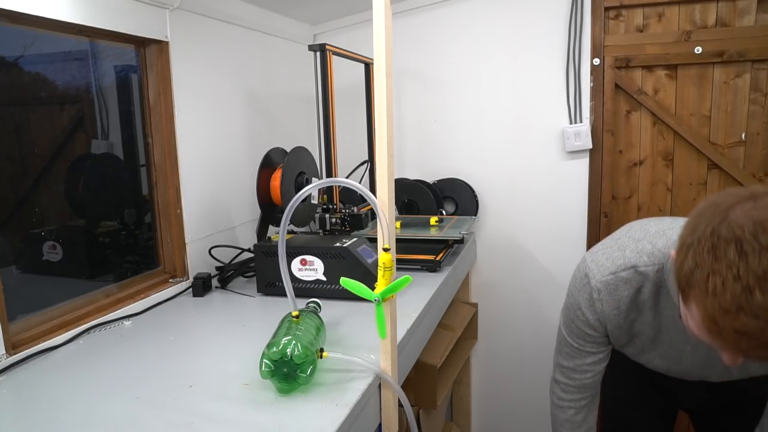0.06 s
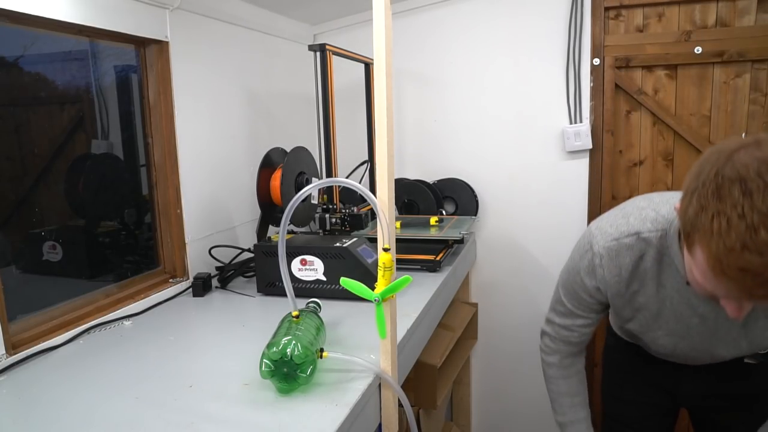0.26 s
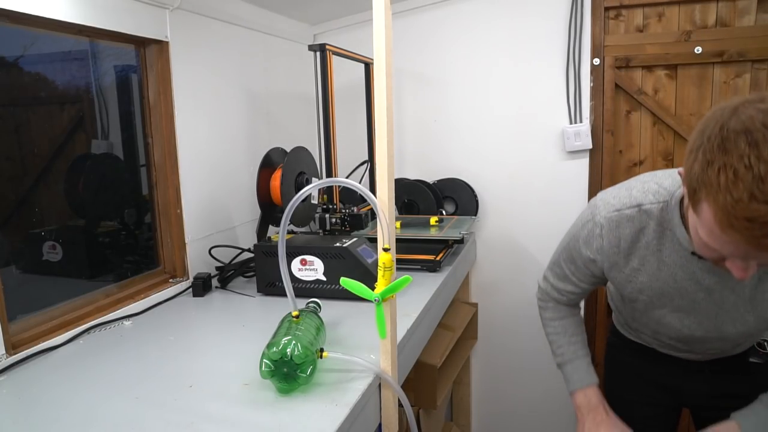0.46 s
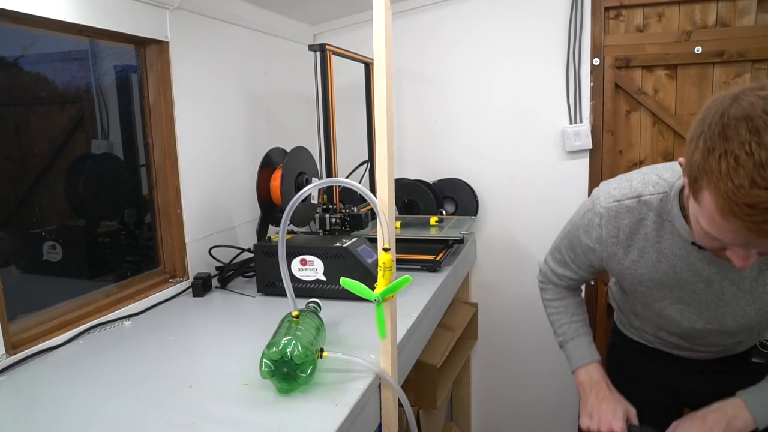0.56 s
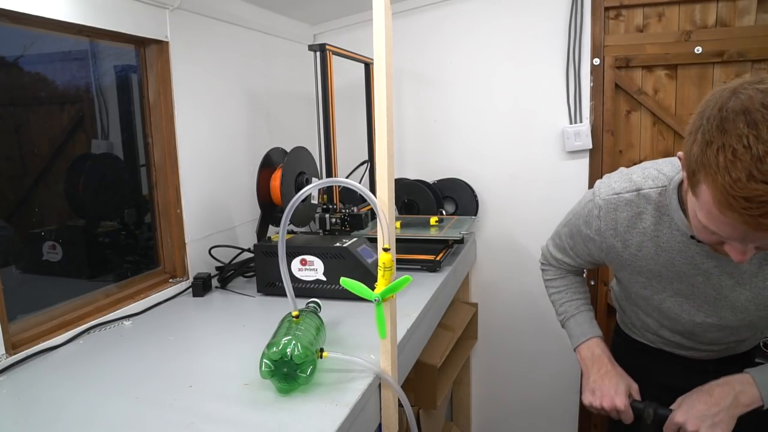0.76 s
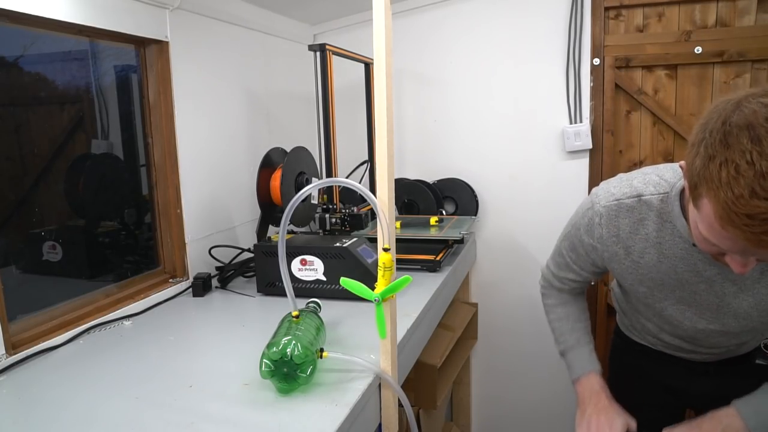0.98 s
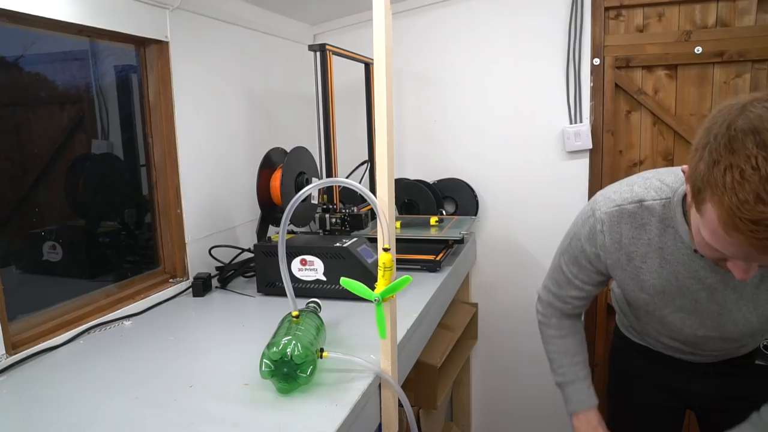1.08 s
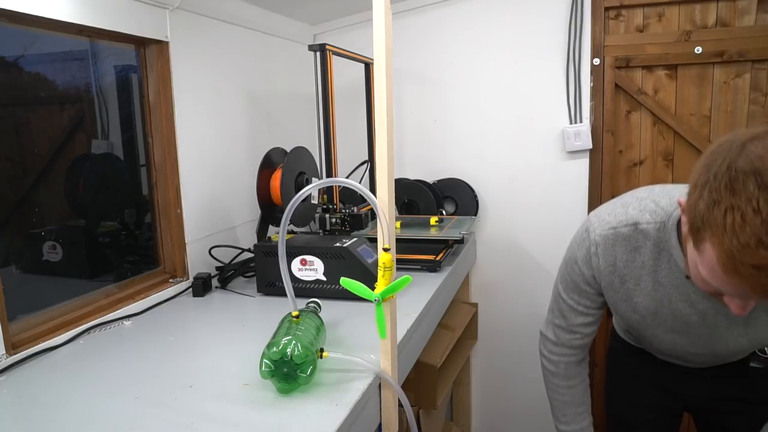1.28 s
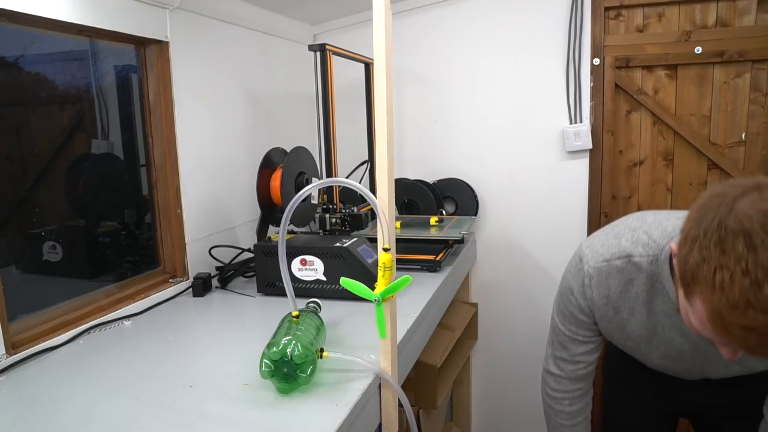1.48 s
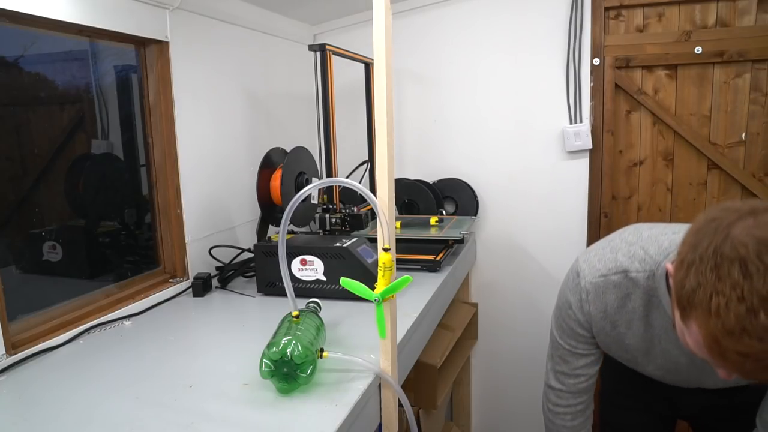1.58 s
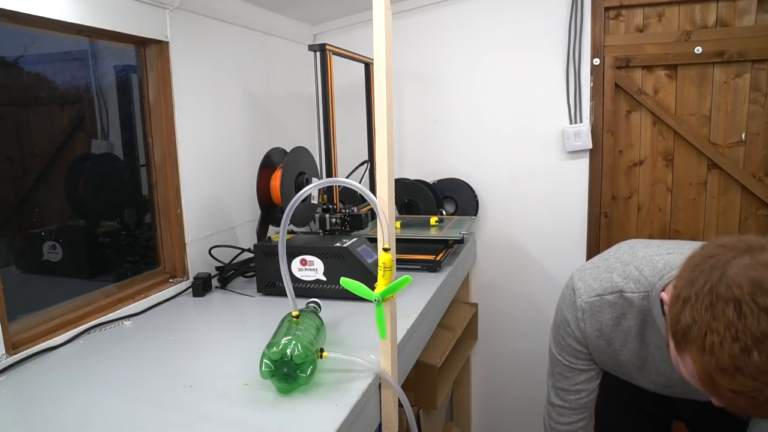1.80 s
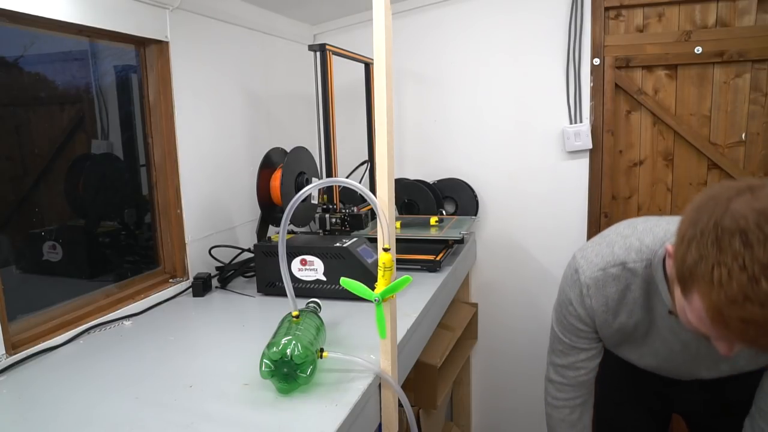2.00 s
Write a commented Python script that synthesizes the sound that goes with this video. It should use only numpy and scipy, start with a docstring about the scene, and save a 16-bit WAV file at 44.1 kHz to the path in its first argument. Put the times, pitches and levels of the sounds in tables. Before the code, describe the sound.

One airy hand pump stroke, up and down, with a whistling push and low thump.

```python
"""A hand pump is worked once in a small workshop, filling a plastic bottle through a hose.
On the pull air hisses in, stick-slip friction of the seal sets the barrel ringing, and the piston's
impact on the top stop excites damped modes. On the push the barrel hums, a turbulent jet through the
valve drives resonances that rise with pressure, and the piston thumps on the bottom stop.
Then the next pull begins."""
import sys
import numpy as np
from scipy import signal
from scipy.fft import rfft, irfft
from scipy.io import wavfile

SR = 44100
rng = np.random.default_rng(int(sys.argv[2]) if len(sys.argv) > 2 else 0)


def materialize(psi):
    """Save the field psi as 16-bit PCM at rate SR to the path in sys.argv[1].

    A 1-D psi becomes a single channel; in a 2-D psi each row is a channel.
    """
    bounded = np.clip(np.atleast_2d(psi).T, -1, 1)
    quanta = np.round(bounded * 32767).astype(np.int16)
    wavfile.write(sys.argv[1], SR, quanta)


N = 90404
TIME = np.arange(N) / SR


def from_db(db):
    """Amplitude ratio of a level in decibels."""
    return 10 ** (np.asarray(db) / 20)

def in_time(rows):
    """Linear interpolation of each column over time; the last is a level, silent before the first row."""
    times, *columns, db = np.transpose(rows)
    return [np.interp(TIME, times, c) for c in columns] + [np.interp(TIME, times, db, left=-np.inf)]

def envelope(rows):
    """Amplitude envelope of a level curve."""
    return from_db(in_time(rows)[0])

def decay(start, t60, attack):
    """Exponential build-up and damping; t60 is the time to fall 60 dB."""
    age = np.maximum(TIME - start, 0)
    return (1 - np.exp(-age / attack)) * from_db(-60 * age / t60)

def colour(white, spectrum):
    """Spectral shaping: white noise of rms 1 takes on the given spectral density."""
    hz, db = np.transpose(spectrum)
    f = np.maximum(np.fft.rfftfreq(2 * N, 1 / SR), 1)
    gain = from_db(np.interp(np.log(f), np.log(hz), db)) * np.minimum(f / hz[0], 1)
    return irfft(rfft(white, 2 * N) * gain)[:N] * np.sqrt(SR / 2)

def noise(spectrum):
    """Stationary Gaussian noise of the given spectral density."""
    return colour(rng.standard_normal(N), spectrum)

def drift(rate_hz):
    """Low-pass random fluctuation with standard deviation 1."""
    f = np.fft.rfftfreq(N, 1 / SR)
    x = irfft(rfft(rng.standard_normal(N)) / (1 + (f / rate_hz) ** 2), N)
    return x / x.std()

def phase(hz):
    """Phase as the time integral of frequency."""
    return 2 * np.pi * np.cumsum(hz * np.ones(N)) / SR

def band_noise(hz, width_hz):
    """A randomly driven resonance: two quadrature components fluctuate independently; rms about 0.71 (1/2)."""
    angle = phase(hz)
    return (drift(width_hz / 2) * np.cos(angle) + drift(width_hz / 2) * np.sin(angle)) / np.sqrt(2)

def rough_tone(hz, db, width_hz, pure_share=.25):
    """A sinusoid and a noise band share the power of one tone."""
    pure = np.sqrt(2 * pure_share) * np.sin(phase(hz))
    return from_db(db) * (pure + np.sqrt(1 - pure_share) * band_noise(hz, width_hz))

def resonate(x, peaks, width_hz, trim_db=0):
    """Resonant filtering: each row adds a Lorentzian peak or dip to the response in dB."""
    f = np.fft.rfftfreq(N, 1 / SR)
    db = trim_db + sum(gain / (1 + (2 * (f - hz) / width_hz) ** 2) for hz, gain in peaks)
    return irfft(rfft(x) * from_db(db), N)


# background of the workshop: (frequency [Hz], density [dB/Hz])
ROOM_SPECTRUM = [(25, -100), (55, -100), (150, -87.5), (280, -101), (400, -105), (560, -101), (800, -107),
                 (1200, -107), (1650, -102), (2100, -98), (2700, -114), (4000, -117), (8000, -113),
                 (9300, -111), (9950, -100), (10800, -115), (12500, -117), (13700, -114), (15500, -120)]
def room_noise():
    """Stationary ambient noise sets a quiet floor."""
    return noise(ROOM_SPECTRUM)

# air drawn in and driven out: (time [s], level [dB])
PULL_FLOW = [(.05, -44), (.08, -13), (.13, -10.5), (.2, -5.5), (.3, -1), (.48, 1), (.62, -1.5), (.72, -3.5),
             (.76, 0.5), (.8, -4), (.87, -20), (.92, -48), (1.96, -42), (1.98, -14.5), (2.01, -13),
             (2.05, -5.5)]
PUSH_FLOW = [(.935, -27), (.96, -4.5), (1.02, -3.5), (1.08, 3), (1.2, -2), (1.28, -5), (1.6, -5),
             (1.8, -8.5), (1.9, -10), (1.95, -18)]
# its hiss: (frequency [Hz], density [dB/Hz])
PULL_HISS = [(200, -108), (1000, -102), (1500, -101), (2500, -94), (3200, -98), (5200, -97), (7000, -92),
             (8400, -98.5), (9700, -94.5), (11500, -104), (15500, -111)]
PUSH_HISS = [(200, -108), (950, -104), (1400, -89.5), (1900, -93.5), (2600, -92.5), (3100, -99),
             (4300, -95), (6500, -94.5), (7500, -93), (8500, -97.5), (9800, -98), (11500, -104),
             (15500, -112)]
# reflections from nearby surfaces: (delay [s], gain [dB])
ECHOES = [(.0026, -27), (.0047, -11), (.0083, -13.5)]
def airflow(trim_db=-0.97):
    """Turbulent flow radiates broadband hiss, which interferes with its early reflections."""
    direct = envelope(PULL_FLOW) * noise(PULL_HISS) + envelope(PUSH_FLOW) * noise(PUSH_HISS)
    reflected = sum(from_db(db) * np.interp(TIME - delay, TIME, direct, left=0) for delay, db in ECHOES)
    return from_db(trim_db) * (direct + reflected)

def stick_slip(slips_per_s=200, spread_db=1, ring_s=0.0052, smooth_share=0.43):
    """Stick-slip friction: randomly timed, decaying bursts over a smooth rub; rms 1."""
    slips = rng.random(N) < slips_per_s / SR
    strength = from_db(spread_db * np.minimum(rng.exponential(1, N), 3))
    energy = signal.lfilter([1], [1, -np.exp(-2 / (ring_s * SR))], slips * strength ** 2 + 1e-18)
    return rng.standard_normal(N) * np.sqrt(smooth_share + (1 - smooth_share) * energy / energy.mean())

def judder(depth_db=0.33):
    """Slight random amplitude modulation from the juddering seal."""
    return from_db(depth_db * drift(rate_hz=32.4))

# resonances of pump and room: (frequency [Hz], gain [dB])
BODY_RESONANCES = [(57, 5.5), (170, 5.5), (230, 7), (297, 3), (437, 10), (474, 4.5), (523, -6), (602, 1.5),
                   (743, 5.5), (822, 3), (901, 2), (955, 8), (1133, 7), (1276, 0), (1480, 7), (1615, 7)]
def body(x):
    """Fixed resonances of pump and room filter the rubbing and the reverberation."""
    return resonate(x, BODY_RESONANCES, width_hz=8.9)

# friction of the seal: (time [s], level [dB])
PULL_RUB = [(.07, -15), (.112, -18), (.121, -2), (.16, -12.5), (.205, -16), (.224, 5.5), (.25, -2),
            (.3, -2.5), (.322, 5.5), (.36, -1.5), (.4, 1), (.45, 0.5), (.52, -0.5), (.555, 1), (.63, -9),
            (.68, -4.5), (.72, -19), (.76, -4), (.8, -16), (.9, -22), (1.96, -21.5), (1.995, -14.5),
            (2.004, 2.5), (2.05, -8.5)]
PUSH_RUB = [(.93, -29), (.97, -14.5), (1.03, -8), (1.055, 5), (1.1, 2.5), (1.17, -3), (1.29, -4),
            (1.4, -13), (1.6, -18.5), (1.79, -26.5), (1.9, -40)]
# its spectrum: (frequency [Hz], density [dB/Hz])
PULL_RUB_SPECTRUM = [(25, -95), (55, -77.5), (170, -81.5), (230, -91.5), (300, -81.5), (390, -82),
                     (450, -82), (620, -77), (820, -81.5), (1350, -83.5), (2100, -90), (3200, -101),
                     (8000, -118)]
PUSH_RUB_SPECTRUM = [(25, -74), (50, -78), (140, -72), (250, -84), (450, -78.5), (650, -82), (900, -90),
                     (1350, -83.5), (2200, -103), (3500, -108), (8000, -120)]
# ringing of the barrel as the piston rises: (time [s], level [dB])
BARREL_RING = [(.15, -15), (.28, -12), (.42, -3), (.5, 3), (.58, 1.5), (.67, -4.5), (.72, -23),
               (.77, -10.5), (.86, -44)]
# its modes: (frequency [Hz], bandwidth [Hz], level [dB])
BARREL_MODES = [(431.6, 16, -57.5), (472.6, 72, -50), (523.5, 48, -51), (599, 70, -55.5)]
def piston_friction():
    """Friction-induced vibration: the seal rubs both ways and rings the barrel's modes as it rises."""
    pull = envelope(PULL_RUB) * body(colour(stick_slip(), PULL_RUB_SPECTRUM))
    push = envelope(PUSH_RUB) * body(colour(stick_slip(), PUSH_RUB_SPECTRUM))
    barrel = envelope(BARREL_RING) * sum(rough_tone(hz, db, width) for hz, width, db in BARREL_MODES)
    return (pull + push + barrel) * judder()

# ticks of valve and handle: (time [s], level [dB])
TICKS = [(0.0781, -11), (1.8106, -1), (1.9722, -6.5), (1.9919, -8)]
# their spectrum: (frequency [Hz], density [dB/Hz])
TICK_SPECTRUM = [(400, -100), (1500, -78.5), (4000, -93), (6500, -83), (9000, -94.5), (11500, -87),
                 (15500, -108)]
def ticks():
    """Light impacts give brief broadband transients as the stroke reverses."""
    return noise(TICK_SPECTRUM) * sum(from_db(db) * decay(s, t60=0.03, attack=0.0008) for s, db in TICKS)

# soft bumps: (time [s], level [dB], frequency [Hz])
BUMPS = [(0.086, -60.5, 112), (.121, -49, 621), (0.22, -42, 113.2), (0.271, -48.5, 114), (0.317, -48, 118),
         (0.672, -59, 84), (1.051, -40, 147.4), (1.412, -51, 232), (1.736, -58, 205.6), (2.0, -47.5, 136)]
def bumps():
    """Damped free vibration of the pump body as the piston takes up its load."""
    return sum(from_db(db) * decay(s, t60=.17, attack=.003) * np.sin(2 * np.pi * hz * (TIME - s))
               for s, db, hz in BUMPS)

# air column on the pull: (time [s], frequency [Hz], level [dB])
PULL_DRONE = [(.19, 115.2, -82), (.225, 113.6, -56), (.36, 109.9, -69), (.5, 106.6, -57), (.6, 87.8, -55),
              (.685, 79.8, -49.5), (.73, 70.6, -54), (.77, 66.2, -47), (.83, 56.5, -51.5), (.92, 55.6, -74)]
def pull_drone():
    """The resonant frequency of an air column falls as the column lengthens."""
    return rough_tone(*in_time(PULL_DRONE), width_hz=45)

# sharp click of the piston striking each stop: (time [s], peak level [dB], time scale [s])
CONTACT_PULSES = [(0.7907, -36, 0.000083), (1.8124, -28.5, 0.00025)]
def contact_pulses():
    """Sudden deceleration at a stop radiates a single short pressure pulse."""
    out = 0
    for centre, db, scale in CONTACT_PULSES:
        u = (TIME - centre) / scale
        out += from_db(db) * (u * u / 2 - 1) * np.exp(-(u / 2) ** 2)
    return out

def knock(hits, modes, reverb_spectrum):
    """Modal superposition: each contact rings damped modes; the first starts the room's reverberation."""
    out = body(noise(reverb_spectrum)) * decay(hits[0][0], t60=.24, attack=0.0024)
    for start, hit_db in hits:
        age = np.maximum(TIME - start, 0)
        for k, (hz, db, t60) in enumerate(modes):
            amplitude = from_db(hit_db + db - np.minimum(60 * age / t60, 200))
            out += (-1) ** k * amplitude * np.sin(2 * np.pi * hz * age)
    return out

# contacts with the top stop: (time [s], level [dB])
TOP_HITS = [(.7916, -6), (.7946, -2.5), (.8085, -19), (.8205, -20)]
# modes they excite: (frequency [Hz], level [dB], T60 [s])
TOP_MODES = [(317, -31, 0.046), (487, -35.5, 0.11), (519.5, -30, 0.2), (612, -27, 0.089), (708, -33.5, .06),
             (834, -28, 0.046), (1070, -33, 0.033), (1304, -42, 0.028), (1484, -31, 0.069),
             (1582, -30, 0.041), (2160, -37.5, 0.025), (2567, -41, 0.043)]
# reverberation: (frequency [Hz], density [dB/Hz])
TOP_REVERB = [(150, -83), (320, -74), (600, -55.5), (800, -64), (1200, -69.5), (1650, -68.5), (1950, -82.5),
              (2700, -77), (3400, -88), (7000, -97.5), (14000, -115)]
def top_stop():
    """Impact excitation of midrange modes ends the pull with a knock."""
    return knock(TOP_HITS, TOP_MODES, TOP_REVERB)

# tone that climbs with pressure: (time [s], frequency [Hz], level [dB])
CLIMBING_TONE = [(1.08, 206.2, -59), (1.2, 222.8, -61), (1.3, 226.2, -57.5), (1.385, 229.8, -61.5),
                 (1.43, 234.6, -51.5), (1.49, 246.4, -62), (1.6, 269, -66), (1.7, 275, -88)]
# hum of fixed pitch: (time [s], level [dB])
HUM = [(.95, -95), (1.035, -57), (1.06, -43), (1.15, -55), (1.25, -54), (1.38, -69), (1.46, -50),
       (1.58, -57.5), (1.7, -72), (1.8, -51), (1.87, -90)]
def push_hum(hum_hz=171):
    """Two air resonances sound in the barrel under compression, one rising and one steady."""
    climbing = rough_tone(*in_time(CLIMBING_TONE), width_hz=36)
    steady = rough_tone(hum_hz, *in_time(HUM), width_hz=17)
    return climbing + steady

# jet through the valve: (time [s], level [dB])
JET_FLOW = [(1.15, -11.5), (1.28, -7.5), (1.38, -3), (1.5, -3), (1.6, -1), (1.8, -0.5), (1.86, -5.5),
            (1.91, -8.5), (1.96, -22), (2.05, -41)]
# its spectrum: (frequency [Hz], density [dB/Hz])
JET_SPECTRUM = [(2500, -115), (5300, -103), (6500, -91.5), (8000, -93.5), (9300, -92), (10500, -91),
                (12500, -95.5), (14500, -99), (15600, -102)]
# two jet resonances that rise with pressure: (time [s], frequency [Hz], level [dB])
JET_HIGH = [(1.22, 10350, -85), (1.3, 11300, -58), (1.35, 11870, -54), (1.42, 12700, -57),
            (1.52, 13230, -60), (1.65, 14000, -66), (1.82, 14700, -66), (1.9, 15000, -84)]
JET_LOW = [(1.3, 7310, -86), (1.5, 8850, -62), (1.65, 9670, -56.5), (1.78, 10530, -55.5),
           (1.86, 10900, -52), (1.93, 11300, -85)]
# resonances of valve and bottle: (frequency [Hz], gain [dB])
WHISTLES = [(6270, 5), (6900, 4), (7440, 11), (8090, 4), (8352, 10), (8780, 6), (9090, 4), (9530, 10),
            (9870, 7), (10110, 11), (10800, 5), (11490, 4), (12450, 4), (12930, 5), (13400, 4), (14400, 11),
            (15000, 11)]
def valve_jet():
    """A turbulent jet whistles as its rising noise bands sweep through narrow, fixed resonances."""
    bands = in_time(JET_HIGH), in_time(JET_LOW)
    rising = sum(from_db(db) * band_noise(hz, width_hz=1700) for hz, db in bands)
    hiss = envelope(JET_FLOW) * noise(JET_SPECTRUM)
    return resonate(hiss + rising, WHISTLES, width_hz=90, trim_db=-2.8)

# contacts with the bottom stop: (time [s], level [dB])
BOTTOM_HITS = [(1.8103, -16), (1.8138, 1)]
# modes they excite: (frequency [Hz], level [dB], T60 [s])
BOTTOM_MODES = [(134, -34, 0.06), (172, -32, 0.13), (285, -44, 0.11), (428, -29.5, 0.027), (491, -42, 0.17),
                (627, -39.5, 0.09), (830, -51, 0.027), (1240, -40.5, .03)]
# reverberation: (frequency [Hz], density [dB/Hz])
BOTTOM_REVERB = [(25, -68), (55, -62.5), (160, -60.5), (350, -67.5), (520, -66), (850, -72), (1300, -81),
                 (2000, -84), (3200, -102), (8000, -115)]
def bottom_stop():
    """Impact excitation of lower modes ends the push with a thump."""
    return knock(BOTTOM_HITS, BOTTOM_MODES, BOTTOM_REVERB)


def scene():
    """Linear superposition of pump and room, identical in both channels."""
    stops = contact_pulses() + top_stop() + bottom_stop()
    air = valve_jet() + airflow()
    mechanism = ticks() + piston_friction() + bumps()
    air_column = (pull_drone() + push_hum()) * judder()
    return np.tile(stops + air + mechanism + air_column + room_noise(), (2, 1))

def record(dry, low_cut_hz=19.3, high_cut_hz=15650):
    """Band limiting: a gentle high-pass removes the deepest bass, a steep low-pass the highest treble."""
    x = signal.sosfilt(signal.butter(2, low_cut_hz, "high", fs=SR, output="sos"), dry)
    return signal.sosfilt(signal.ellip(12, .1, 80, high_cut_hz, fs=SR, output="sos"), x)


dry = scene()
out = record(dry)
materialize(out)
```